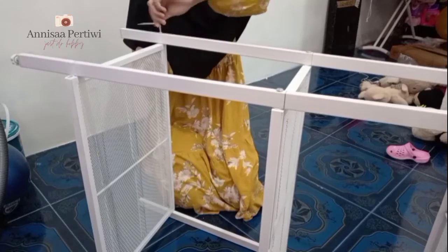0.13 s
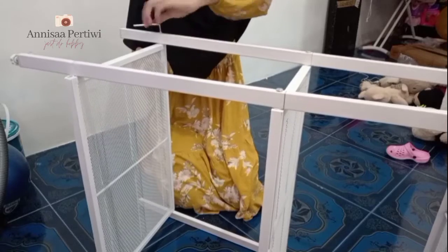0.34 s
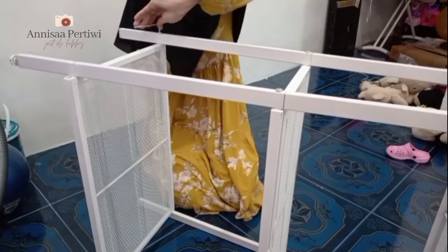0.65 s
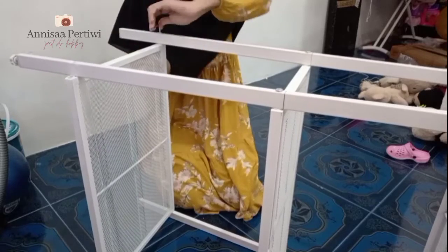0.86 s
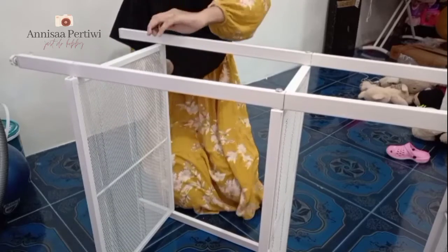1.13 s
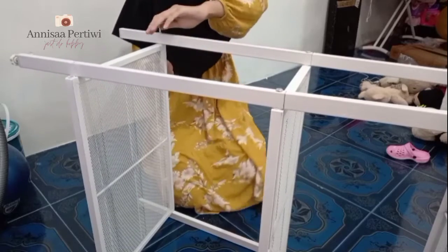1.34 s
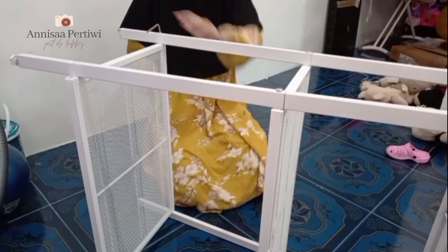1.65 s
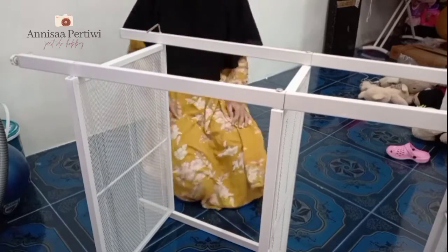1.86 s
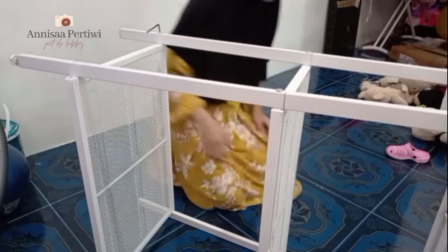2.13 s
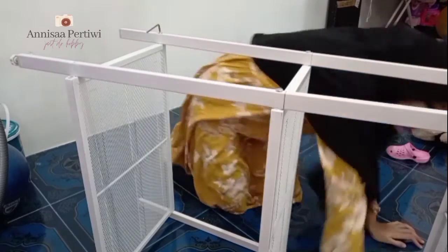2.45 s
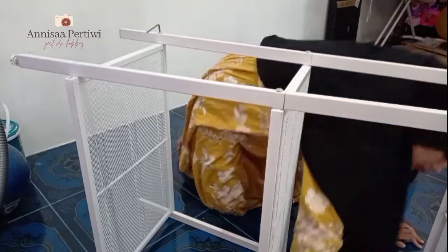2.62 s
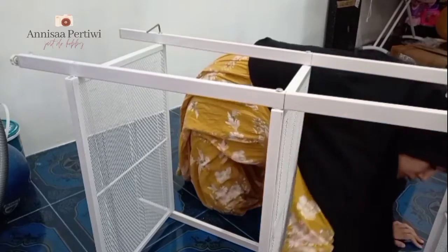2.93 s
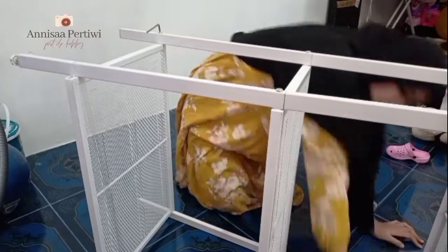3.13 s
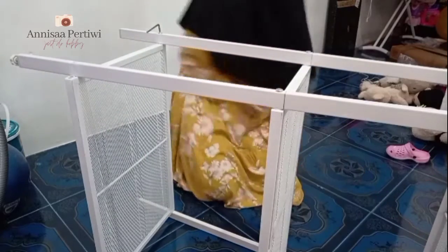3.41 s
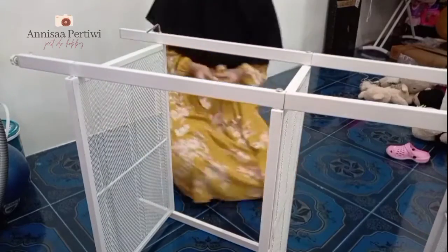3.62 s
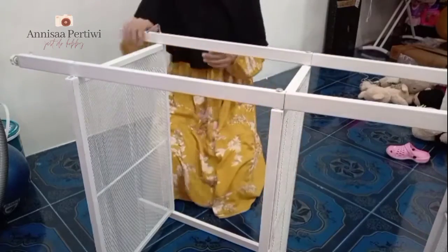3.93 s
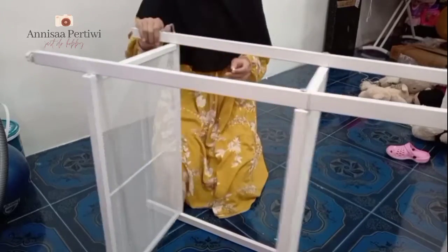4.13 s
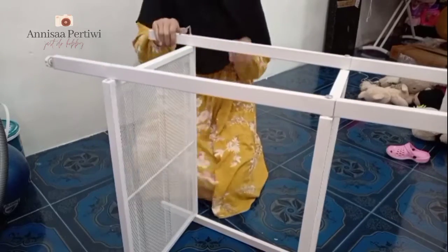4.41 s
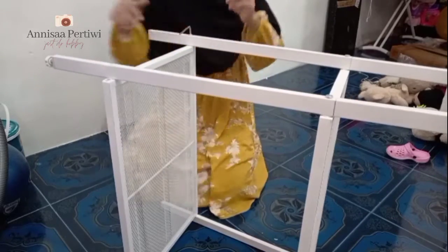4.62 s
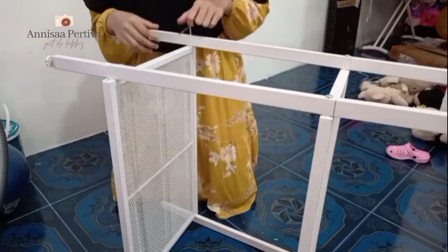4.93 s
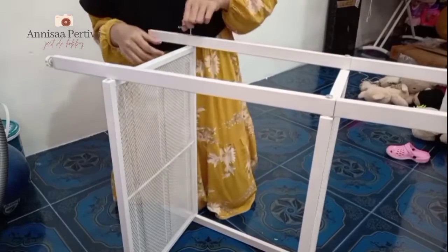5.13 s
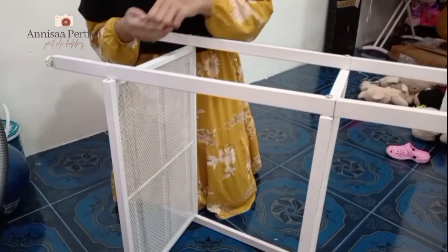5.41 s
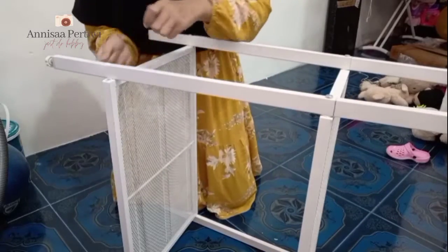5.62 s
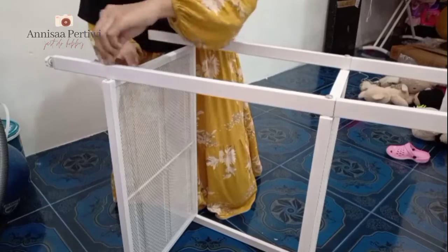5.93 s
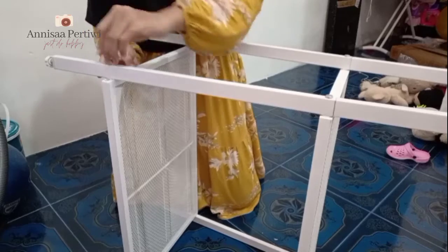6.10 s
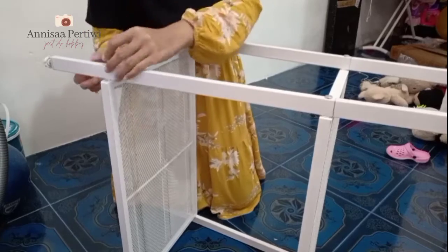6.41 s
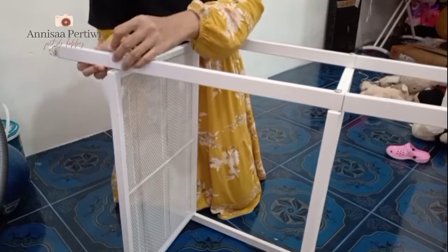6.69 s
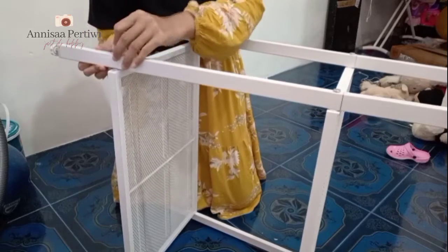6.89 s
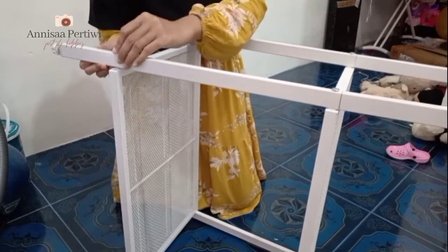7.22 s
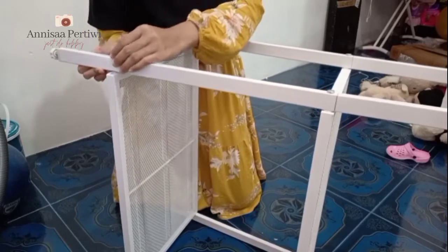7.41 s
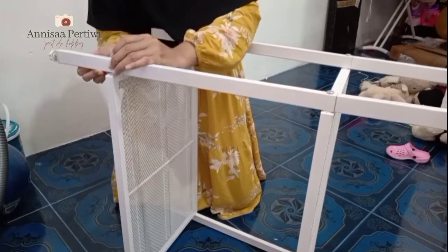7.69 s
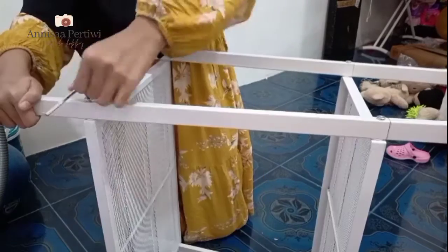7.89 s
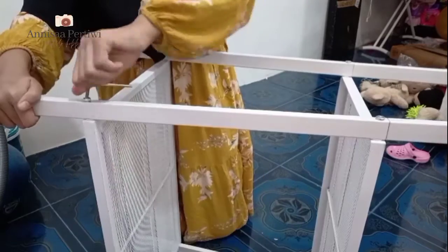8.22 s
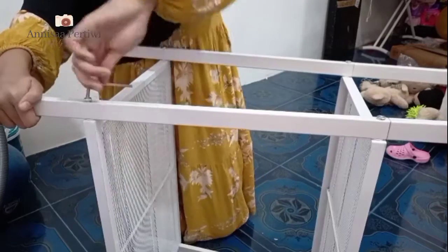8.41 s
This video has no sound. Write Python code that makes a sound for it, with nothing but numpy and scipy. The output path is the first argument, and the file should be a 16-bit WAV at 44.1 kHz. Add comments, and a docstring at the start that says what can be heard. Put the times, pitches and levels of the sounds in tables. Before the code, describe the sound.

A fan drones on one side while a metal shelf frame scuffs the tiles, then a key clicks and clanks hard, suddenly turning everything quieter.

```python
"""A hex key clicks sharply on bolts and tube as a steel shelf frame is put together in a small tiled room.
Each click is a noise crack with ringing steel and rattling wire mesh; jerky noise makes the feet scuff the tiles.
Soft bumps are noise pushes into one resonance each, and a sleeve is a short swell of hiss.
A fan (filtered noise and sines) hums behind; all of this is on the left, with only electronic hiss on the right.
A loud enough sound turns the level down for good, and at the end everything fades out."""
import sys
import numpy as np
from scipy import signal
from scipy.fft import rfft, irfft, next_fast_len
from scipy.io import wavfile
from scipy.ndimage import uniform_filter1d

SR = 44100
rng = np.random.default_rng(int(sys.argv[2]) if len(sys.argv) > 2 else 0)


def generate_wav(sig):
    """Save sig (samples, or channels by samples) to the path in sys.argv[1] as 16-bit PCM at SR."""
    pcm = np.round(np.clip(np.atleast_2d(sig).T, -1, 1) * 32767).astype(np.int16)
    wavfile.write(sys.argv[1], SR, pcm)


N = 377055  # length in samples


def amp(db):
    """Turns decibels into a gain."""
    return 10 ** (np.asarray(db) / 20)


def unit(x):
    """Scales a sound to an rms of 1."""
    return x / np.sqrt(np.mean(x ** 2) + 1e-20)


def blow(x):
    """Scales a short sound to the energy of 10 ms at an rms of 1."""
    return x * np.sqrt(SR * .01 / (np.sum(x ** 2) + 1e-20))


def read(points, hz):
    """Reads a table of (Hz, value) between its points, on a log-frequency axis."""
    f, value = np.transpose(points)
    return np.interp(np.log(hz + 1), np.log(f), value)


def add(mix, start_s, sound):
    """Adds a sound to the mix at a time in seconds, cut off where the mix ends."""
    part = mix[round(start_s * SR):][:len(sound)]
    part += sound[:len(part)]


def colour(x, points, tilt_db=0, peaks=()):
    """Filters by a spectrum, tilted by some dB per octave and lifted at peaks (Hz, width Hz, dB)."""
    size = next_fast_len(2 * len(x))
    hz = np.fft.rfftfreq(size, 1 / SR)
    lift_db = sum(db / (1 + (2 * (hz - f) / width) ** 2) for f, width, db in peaks)
    slope_db = tilt_db * np.log2(np.maximum(hz, 400))
    gain = amp(read(points, hz) + slope_db + lift_db)
    return irfft(rfft(x, size) * gain, size)[:len(x)]


def drift(rate_hz, count=24):
    """A slow random curve of rms 1: a sum of sines up to rate_hz, the slower ones stronger."""
    t = np.linspace(0, N / SR, N // 64)
    speeds = np.geomspace(rate_hz / 10, rate_hz, count)
    slow = sum(np.sin(2 * np.pi * (f * t + rng.random())) / np.sqrt(f) for f in speeds)
    return np.interp(np.arange(N) / SR, t, unit(slow))


# A slower contact pushes the tube more: the clank lies CLANK_DB from the tick at USUAL_CONTACT_S.
CLANK_DB, CLANK_DB_PER_DOUBLING, USUAL_CONTACT_S = -7.2, 1.9, .003
# A touch lighter than GRAZE_DB hardly moves the tube, so its clank changes by GRAZE_CLANK_DB.
GRAZE_DB, GRAZE_CLANK_DB = -35, -9
# Skid before a click: its tick is SKID_DB plus a share of the click's dB, so it is firmer before a hard one.
SKID_DB, SKID_FOLLOWS, SKID_CLANK_DB, SKID_CONTACT_SHARE = -28.5, .3, -32.5, .55
# The key touching bolt and tube. Each row: start in seconds, tick level in dB, contact (decay) time in
# seconds, frequency in Hz where the tick is lifted, how many seconds earlier a skid starts (0 for no skid).
KEY_CLICKS = [(.636, -40.5, .005, 11500, 0), (1.745, -44, .004, 7900, 0), (2.225, -40, 0.0097, 12000, 0),
              (2.429, -42.5, .005, 8100, 0), (3.164, -44, .003, 9440, 0), (5.315, -38, 0.0017, 8100, 0),
              (6.004, -29.5, .0033, 10060, 0), (6.1132, -26.5, .002, 9400, .0205),
              (6.169, -33.5, .006, 8800, 0), (6.2715, -21, .016, 8600, 0),
              (6.2905, -21.5, .009, 8400, 0.00029), (6.317, -21.5, .0005, 10900, 0.00027),
              (6.504, -19.5, 0.0027, 9760, 0.00011), (6.6877, -23, .0007, 10800, 0.012),
              (6.852, -39.5, 0.0019, 10500, 0), (6.947, -12, .0009, 12250, 0.01),
              (7.2205, -15.5, .0044, 10000, .016), (7.2256, -9, 0.00074, 10100, 0),
              (7.382, -9, .0024, 9380, .0131), (7.468, -26.5, 0.0019, 10400, 0),
              (7.738, -28, .0013, 10200, 0.00022), (7.856, -4.2, .0052, 8900, 0.00074),
              (7.98, -24, .03, 9380, 0)]


def contacts(skid_hz=9800):
    """Before it seats, the key may skid over the bolt head; gives (s, tick dB, clank dB, contact s, lift Hz)."""
    for start_s, tick_db, contact_s, lift_hz, skid_s in KEY_CLICKS:
        if skid_s > 0:
            skid_db = SKID_DB + SKID_FOLLOWS * tick_db
            yield start_s - skid_s, skid_db, SKID_CLANK_DB, SKID_CONTACT_SHARE * skid_s, skid_hz
        push_db = CLANK_DB + CLANK_DB_PER_DOUBLING * np.log2(contact_s / USUAL_CONTACT_S)
        graze_db = GRAZE_CLANK_DB * (tick_db < GRAZE_DB)
        yield start_s, tick_db, tick_db + push_db + graze_db, contact_s, lift_hz


# Ringing tones of key and frame. Each row: frequency in Hz, level in dB, time to fall by 60 dB in seconds.
STEEL_TONES = [(1658, -1, .3), (2295, -2, .28), (3170, -1, .25), (3415, -1, .25), (3820, 3, .3),
               (3960, -1, .25), (4780, -3, .28), (4838, -3, .28), (5043, 1, .3), (5146, 0, .28),
               (5820, 5, .3), (6440, 4, .3), (7930, 2, .22), (8055, 1, .24), (8435, 6, .25), (8685, 1, .22),
               (8780, -1, .22), (9278, 0, .25), (9435, 1, .25), (9915, 0, .22), (10355, -3, .22),
               (10730, -2, .24), (11690, -1, .18), (12985, 1, .18)]
# Tone colour of the sharp tick. Each row: frequency in Hz, relative level in dB per Hz.
TICK_SPECTRUM = [(500, -46.5), (4000, -25), (7300, -15), (8200, -7), (9000, -7), (10300, 0), (11200, -7.5),
                 (12100, -5), (13300, -19.5), (14500, -24), (15600, -28)]
# Tone colour of the deeper clank of the tube. Each row: frequency in Hz, relative level in dB per Hz.
CLANK_SPECTRUM = [(100, -40.5), (400, -28.5), (1200, -18.5), (2400, -11), (3500, -6), (3900, -1.5),
                  (4450, -9), (4900, 4.5), (5500, -5.5), (6600, -6), (8000, -28.5), (15000, -42.5)]


def key(ring_db=-6, clank_ring_db=-6, mesh_db=1.0, mesh_t60_s=.12, lift_db=5, lift_width_hz=1500,
        uneven_db=2, rise_s=0.00042, rattle_db=2.5):
    """Each contact is a short crack that rings the steel and rattles the wire-mesh shelves."""
    out, t = np.zeros(N), np.arange(SR // 3) / SR
    hz, tone_db, t60_s = np.transpose(STEEL_TONES)
    fall = np.exp(-np.log(1000) * t / t60_s[:, None])
    tones = amp(tone_db[:, None]) * fall * np.sin(2 * np.pi * hz[:, None] * t)
    for start_s, tick_db, clank_db, contact_s, lift_hz in contacts():
        lift = [(lift_hz, lift_width_hz, lift_db)]  # the grip and the spot struck colour each tick
        layers = (TICK_SPECTRUM, tick_db, ring_db), (CLANK_SPECTRUM, clank_db, clank_ring_db)
        for spectrum, db, rung_db in layers:
            press = (1 - np.exp(-t / rise_s)) * np.exp(-t / contact_s)
            crack = rng.standard_normal(len(t)) * press
            # every contact wakes the tones by different amounts
            shares = rng.choice([-1, 1], len(hz)) * amp(uneven_db * rng.standard_normal(len(hz)))
            ring = shares @ tones
            # countless short-lived wire tones sound like fading noise; loose wires chatter
            mesh = rng.standard_normal(len(t)) * amp(-60 * t / mesh_t60_s)
            chatter = unit(uniform_filter1d(rng.standard_normal(len(t)), size=150))
            mesh = mesh * amp(rattle_db * chatter)
            for part, part_db in (crack, 0), (ring, rung_db), (mesh, mesh_db):
                add(out, start_s, amp(db + part_db) * blow(colour(part, spectrum, peaks=lift)))
    return out


# The frame's feet scuffing the tiles. Each row: start in seconds, level in dB, slide (decay) time in
# seconds, brightness tilt in dB per octave.
FOOT_SCUFFS = [(4.191, -25, .026, -2.5), (4.264, -23, 0.051, -.7), (4.413, -23, 0.027, 2.5),
               (4.481, -24.5, .011, -.5), (4.576, -34, .033, 5.5), (5.715, -34.5, 0.027, -7.5),
               (6.68, -24, .013, -3), (6.747, -22, .018, -1)]
# Tone colour of a scuff. Each row: frequency in Hz, relative level in dB per Hz.
SCUFF_SPECTRUM = [(100, -47.5), (400, -2), (1200, 3.5), (2500, 3.5), (3400, 2.5), (4400, 9), (6000, 3.5),
                  (7400, -1.5), (10500, 4), (13000, -8), (16000, -29.5)]


def scuffs(slips_per_s=1200, smooth_share=0.3, break_db=5, break_s=0.0063):
    """The feet break loose with a jerk, then stick and slip in a quickly dying run of tiny jolts."""
    out, t = np.zeros(N), np.arange(SR // 2) / SR
    for start_s, db, slide_s, tilt_db in FOOT_SCUFFS:
        slips = rng.random(len(t)) < slips_per_s / SR
        jolts = rng.standard_normal(len(t)) * (smooth_share + slips)
        jerk = amp(break_db * np.exp(-t / break_s))
        force = np.exp(-t / slide_s) * jerk
        add(out, start_s, amp(db) * blow(colour(jolts * force, SCUFF_SPECTRUM, tilt_db)))
    return out


BUMP_WIDTH_HZ, BUMP_S = 170, .036  # width of each resonance, length of each push
SLEEVE_AT_S, SLEEVE_DB, SLEEVE_RISE_S, SLEEVE_FALL_DB_PER_S = 0.88, -33.5, 0.027, 42
# Soft bumps and small squeaks of someone moving about. Each row: start in seconds, level in dB,
# resonance in Hz.
BODY_BUMPS = [(.091, -29, 1000), (1.65, -32, 675), (2.194, -26.5, 945), (2.194, -32, 600),
              (2.426, -33, 1040), (2.56, -29.5, 970), (2.766, -39, 3090), (3.049, -30, 1000),
              (4.776, -34.5, 1030), (5.708, -32.5, 522.5)]
# Tone colour of the sleeve. Each row: frequency in Hz, relative level in dB per Hz.
CLOTH_SPECTRUM = [(1000, -37), (7000, -8), (9000, -4), (11000, 8.5), (13000, 1.5), (15000, -6.5),
                  (16000, -24)]


def movements():
    """Soft pushes into one resonance each, and the hiss of a sleeve that swells quickly and dies away."""
    out, t = np.zeros(N), np.arange(SR // 4) / SR
    for start_s, db, hz in BODY_BUMPS:
        push = rng.standard_normal(len(t)) * np.sin(np.pi * np.minimum(t / BUMP_S, 1))
        body = t * np.exp(-np.pi * BUMP_WIDTH_HZ * t) * np.sin(2 * np.pi * hz * t)
        add(out, start_s, amp(db) * blow(signal.fftconvolve(push, body)[:len(t)]))
    since_s = np.maximum(np.arange(N) / SR - SLEEVE_AT_S, 0)
    swell = np.minimum(since_s / SLEEVE_RISE_S, 1)
    brush = swell * amp(SLEEVE_DB - SLEEVE_FALL_DB_PER_S * since_s)
    return out + brush * unit(colour(rng.standard_normal(N), CLOTH_SPECTRUM))


def room(x, low_t60_s=0.38, high_t60_s=0.21, first_s=.003):
    """Reflections from tiles and walls grow denser as they fade; the treble dies first."""
    t = np.arange(SR * 3 // 4) / SR
    present = (rng.random(len(t)) < .1 + 4 * t) * (t > first_s)
    taps = rng.standard_normal(len(t)) * present
    hz, at_s, bands = signal.stft(taps, SR, nperseg=256)
    t60_s = read([(3500, low_t60_s), (11000, high_t60_s)], hz)[:, None]
    tail = signal.istft(bands * amp(-60 * at_s / t60_s), SR, nperseg=256)[1]
    return signal.fftconvolve(x, tail / np.linalg.norm(tail))[:N]


MAINS_HZ = 50.1
# Tone colour of the fan's rush of air. Each row: frequency in Hz, relative level in dB per Hz.
AIR_SPECTRUM = [(30, -26.5), (80, -24), (98, -20.5), (155, -19), (200, -12), (330, -11.5), (520, -4.5),
                (780, -5), (1000, -2), (1500, -6.5), (2100, -13), (3300, -15.5), (4800, -13.5),
                (7200, -23.5), (11200, -19.5), (15500, -36.5)]
# Resonances in the rush. Each row: frequency in Hz, width in Hz, lift in dB (a dip if negative).
AIR_RESONANCES = [(175, 20, 5), (250, 16, 5), (592, 36, 5), (622, 16, -6), (945, 20, 3.5), (1012, 24, 3),
                  (1085, 60, 6), (1395, 80, 3), (1740, 160, 2.5), (2310, 70, 4), (2680, 90, -4),
                  (3450, 90, -4), (7920, 200, 4)]
# Hum of the fan motor. Each row: multiple of the mains frequency, level in dB.
MOTOR_HUM = [(4, -43), (8, -37.5), (10, -52)]


def fan(air_db=-33.0, patchy_db=1.5, flutter_db=0.5, standing_db=3.0, waver_db=-0.47):
    """A rush of air that flutters most around 1 kHz, over a wavering motor hum."""
    frames, hz = N // 256 + 5, np.fft.rfftfreq(1024, 1 / SR)
    re, im, patches, gusts = rng.standard_normal((4, frames, len(hz)))
    # smoothing over time (axis 0) and frequency (axis 1) makes slow, broad level changes
    patches = unit(uniform_filter1d(uniform_filter1d(patches, size=7, axis=0), size=4, axis=1))
    gusts = unit(uniform_filter1d(uniform_filter1d(gusts, size=5, axis=0), size=20, axis=1))
    level_db = patchy_db * patches + flutter_db * gusts / (1 + ((hz - 1000) / 600) ** 2)
    noise = (re + 1j * im) * amp(level_db)
    air = signal.istft(noise.T, nperseg=1024, noverlap=768)[1][:N]
    # standing waves ripple the spectrum, less so in the bass
    grid_hz = np.arange(30, SR / 2, 16)
    waves = rng.standard_normal(len(grid_hz)) * np.minimum(grid_hz / 2500, 1)
    ripple = np.transpose([grid_hz, read(AIR_SPECTRUM, grid_hz) + standing_db * waves])
    rush = amp(air_db) * unit(colour(air, ripple, peaks=AIR_RESONANCES))
    turns = MAINS_HZ * np.arange(N) / SR
    hum = np.zeros(N)
    for multiple, db in MOTOR_HUM:
        tone = np.sin(2 * np.pi * (round(multiple) * turns + rng.random()))
        hum += amp(db + waver_db * drift(1.5)) * tone
    return rush + np.sqrt(2) * hum  # sqrt(2) gives a sine an rms of 1


# Tone colour of the electronic hiss. Each row: frequency in Hz, relative level in dB per Hz.
HISS_SPECTRUM = [(30, 2.5), (100, -7.5), (250, -2), (1000, -4), (2200, -8.5), (5200, -7), (6800, -17),
                 (10000, -21), (14300, -24.5), (15600, -36)]


def electronic_hiss(hiss_db=-51.5):
    """Random electrical noise, heard as a faint steady hiss."""
    return amp(hiss_db) * unit(colour(rng.standard_normal(N), HISS_SPECTRUM))


def scene(key_room_db=-5.5, scuff_room_db=2, move_room_db=-4):
    """Everything reaches the left channel; the right holds only electronic hiss."""
    clicks, feet, moves = key(), scuffs(), movements()
    sent = amp(key_room_db) * clicks + amp(scuff_room_db) * feet + amp(move_room_db) * moves
    left = clicks + feet + moves + room(sent) + fan()
    return np.array([left, electronic_hiss()])


TRIP_DB, CEILING, EDGE_HZ = -10, .72, 15250  # overload level, soft-clip limit, top of the band
# The closing fade: its start in seconds, then its end in seconds.
FADE_TIMES = (7.92, 8.075)


def record(dry, step_db=-10.5, offset=.0044, settle_s=.06):
    """An overload steps the gain down for good; then soft clip, fade and band limit."""
    power = signal.lfilter(np.ones(220) / 220, 1, dry[0] ** 2)  # mean over 5 ms
    tripped = np.maximum.accumulate(power > amp(TRIP_DB) ** 2)  # once on, stays on
    lowered = signal.lfilter(np.ones(110) / 110, 1, tripped)  # steps over 2.5 ms
    settled = 1 - np.exp(-np.cumsum(tripped) / (SR * settle_s))
    # a constant offset, there from the start, sinks more slowly than the gain
    stepped = dry * amp(step_db * lowered) + offset * amp(step_db * settled)
    held = CEILING * np.tanh(stepped / CEILING)
    faded = held * np.interp(np.arange(N) / SR, FADE_TIMES, [1, 0])
    lowpass = signal.firwin(255, EDGE_HZ, window=("kaiser", 8), fs=SR)
    return signal.oaconvolve(faded, lowpass[None], "same")


dry = scene()
out = record(dry)
generate_wav(out)
```